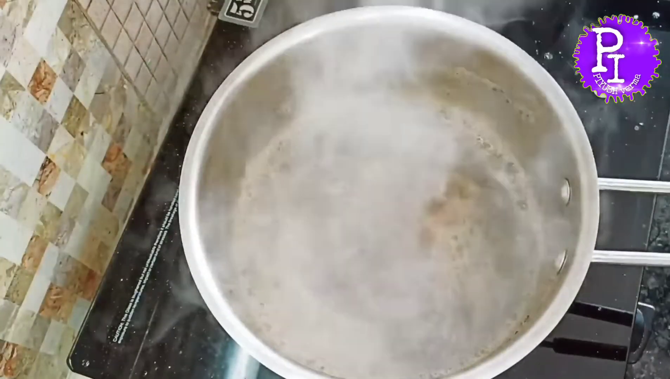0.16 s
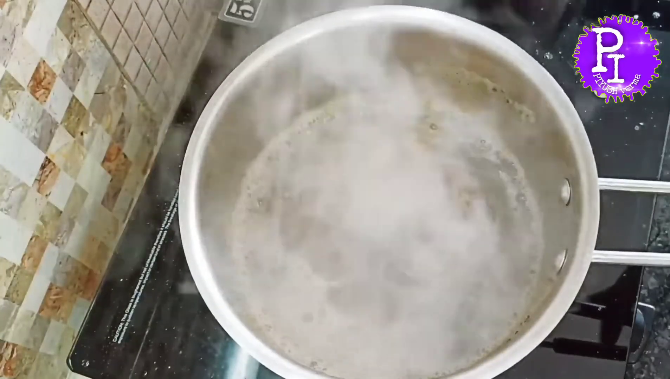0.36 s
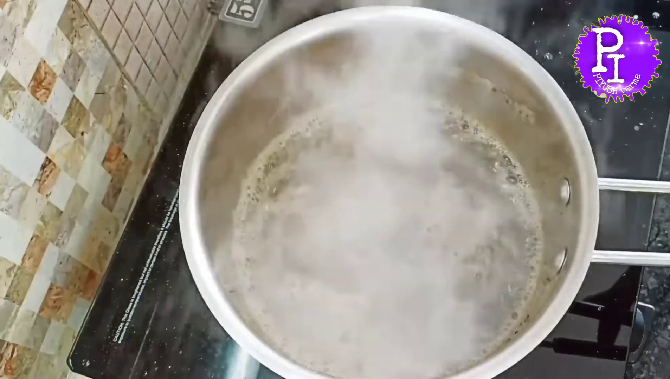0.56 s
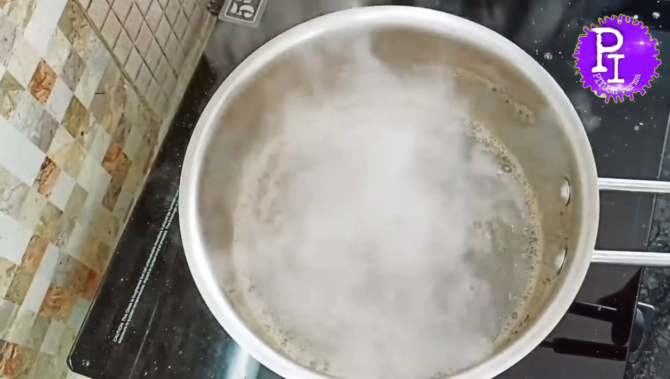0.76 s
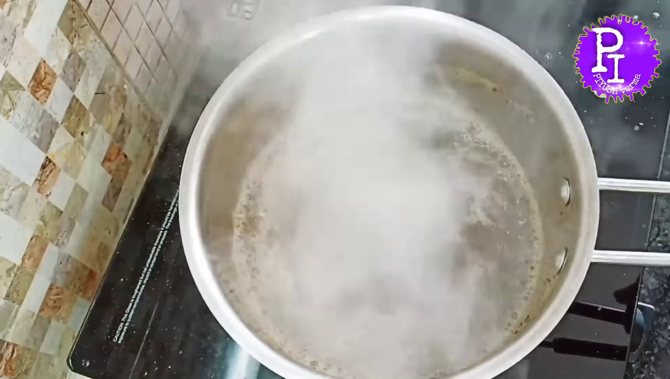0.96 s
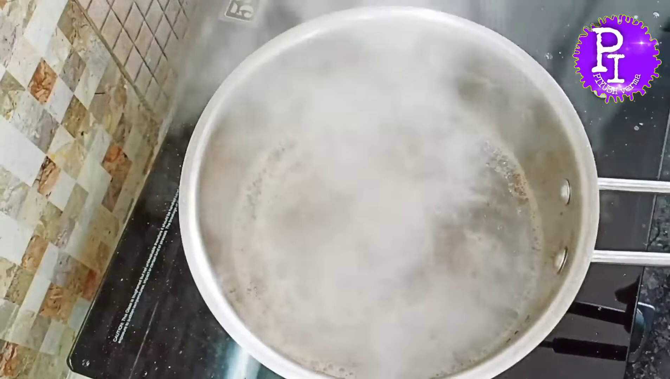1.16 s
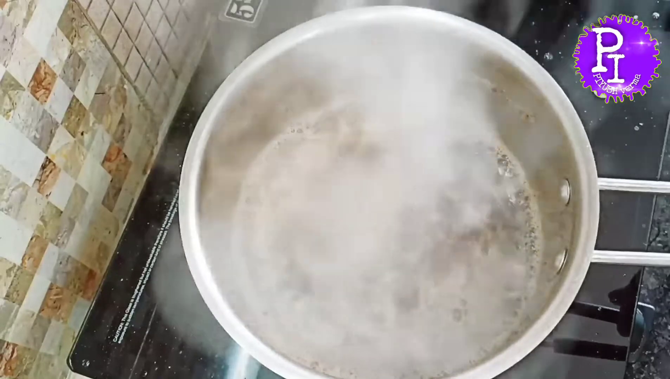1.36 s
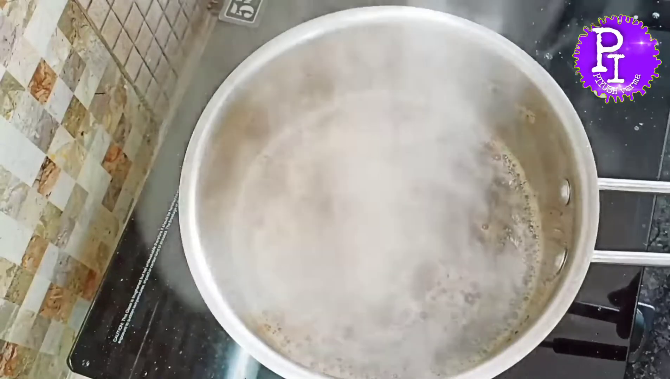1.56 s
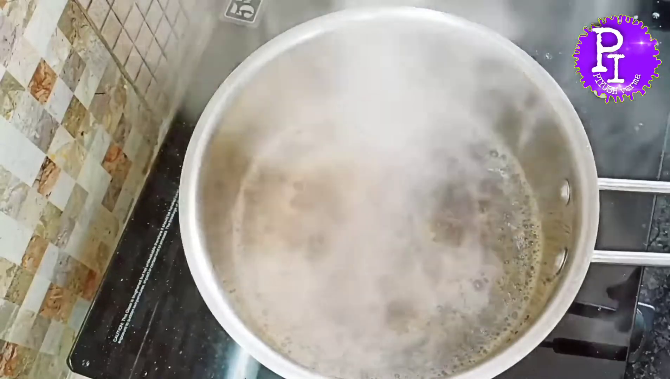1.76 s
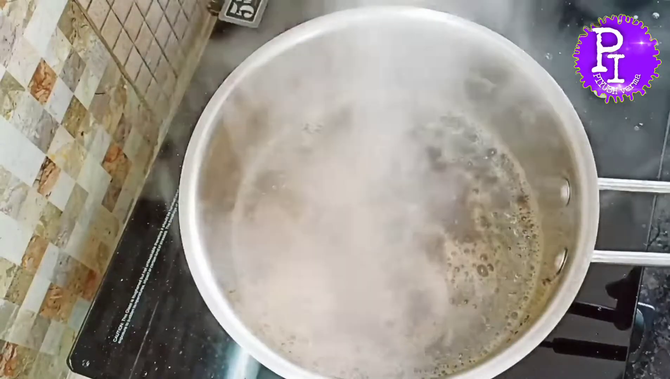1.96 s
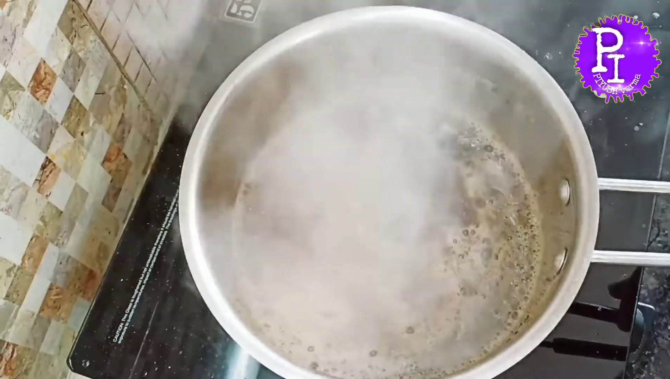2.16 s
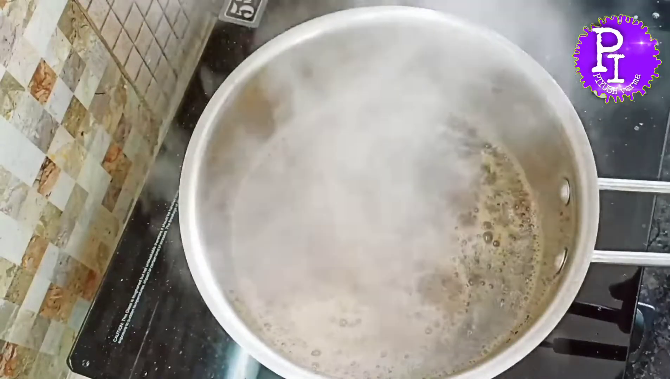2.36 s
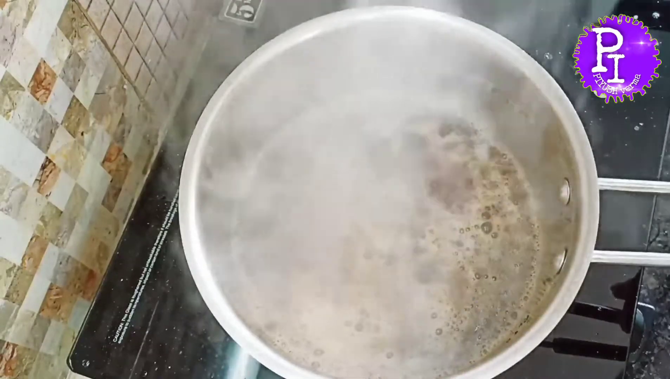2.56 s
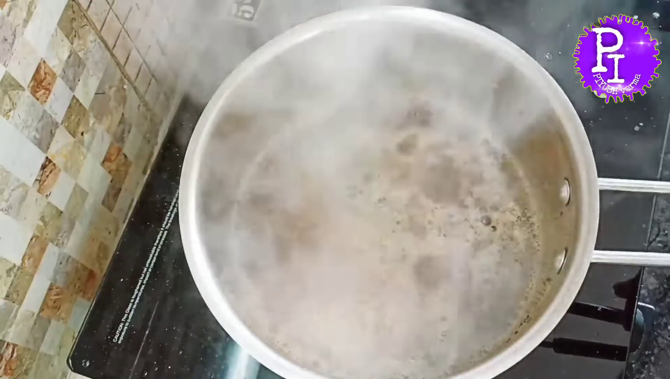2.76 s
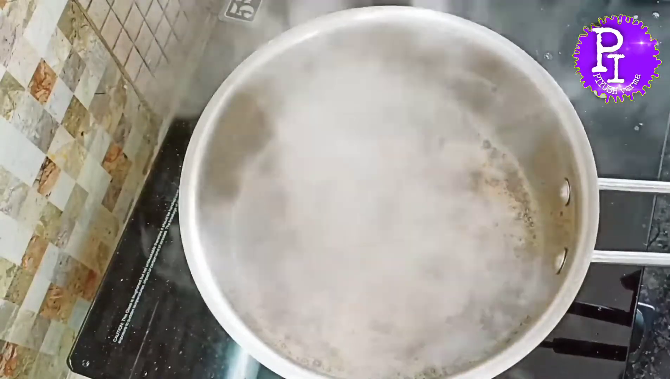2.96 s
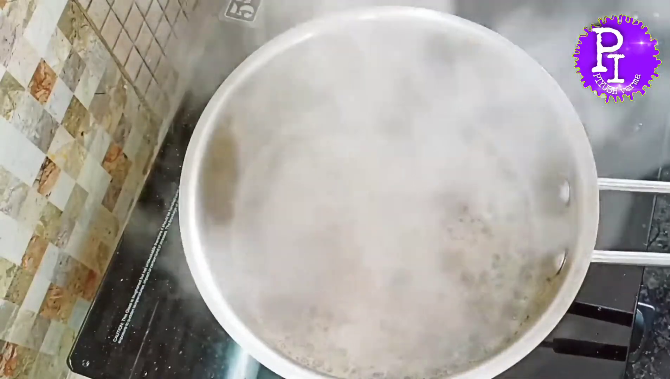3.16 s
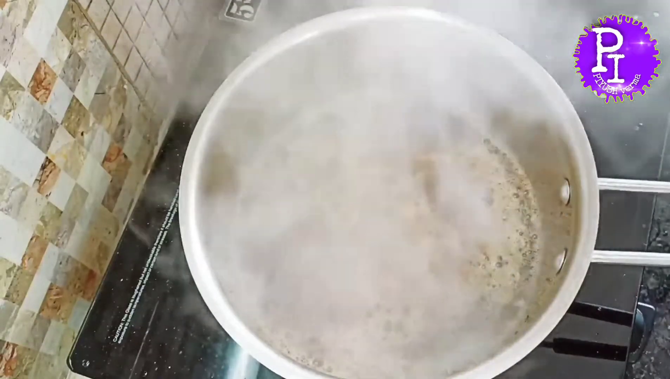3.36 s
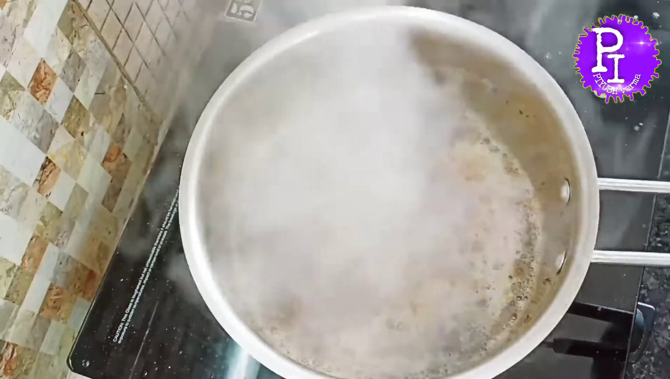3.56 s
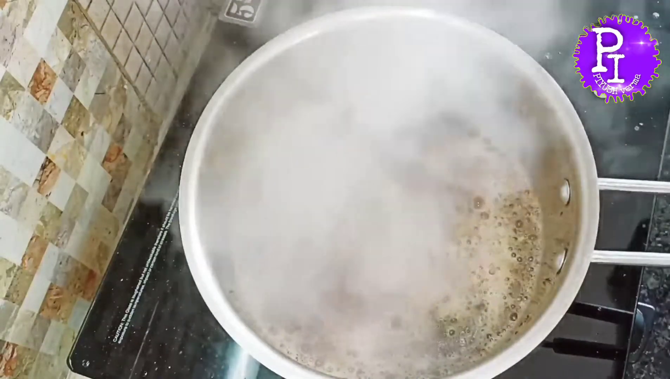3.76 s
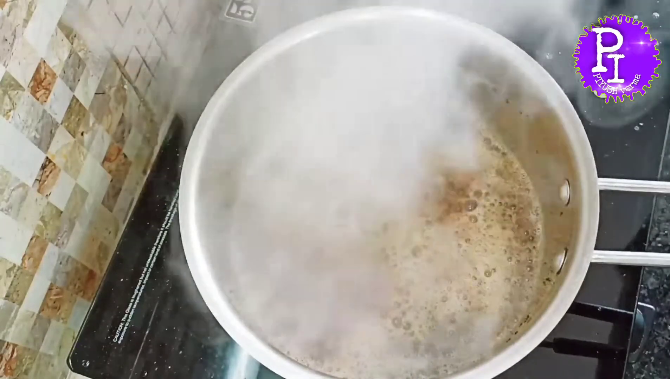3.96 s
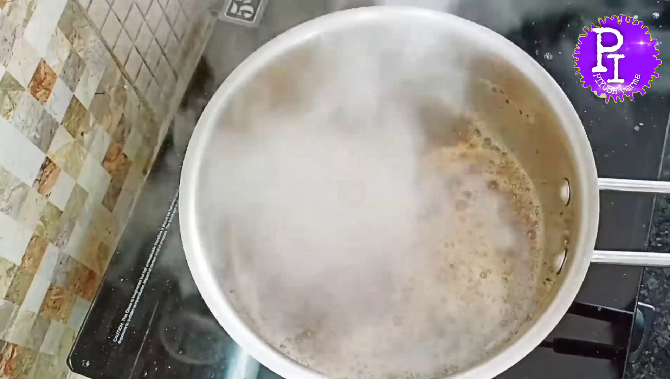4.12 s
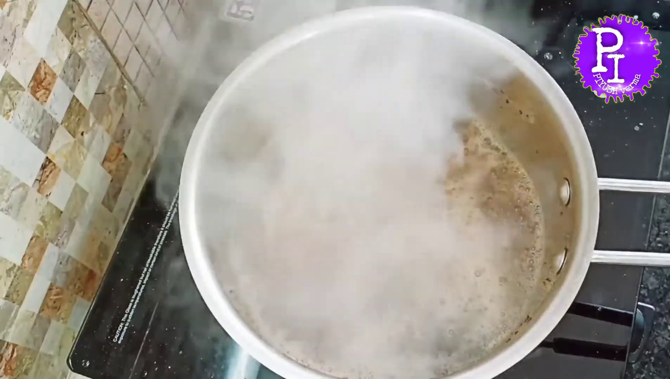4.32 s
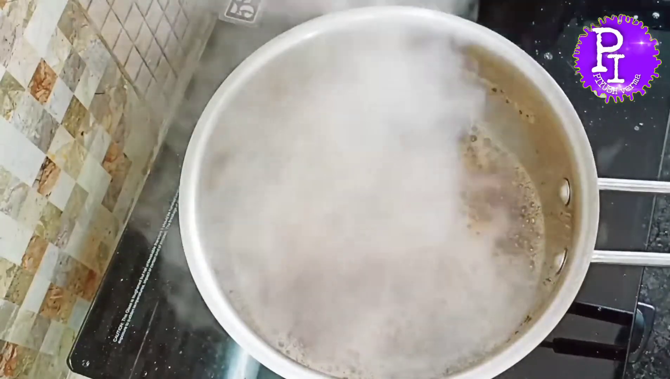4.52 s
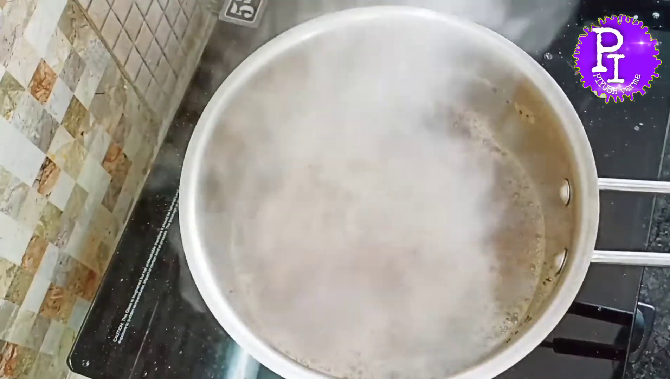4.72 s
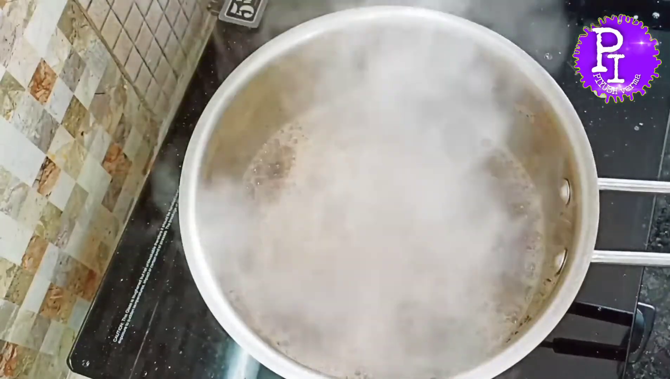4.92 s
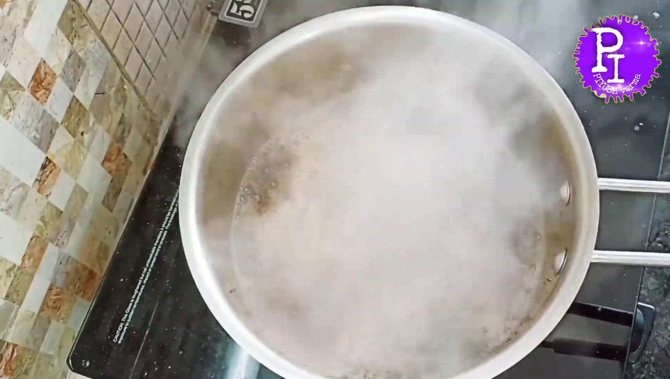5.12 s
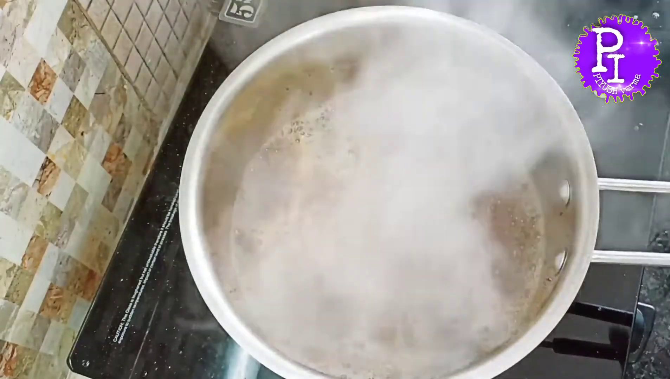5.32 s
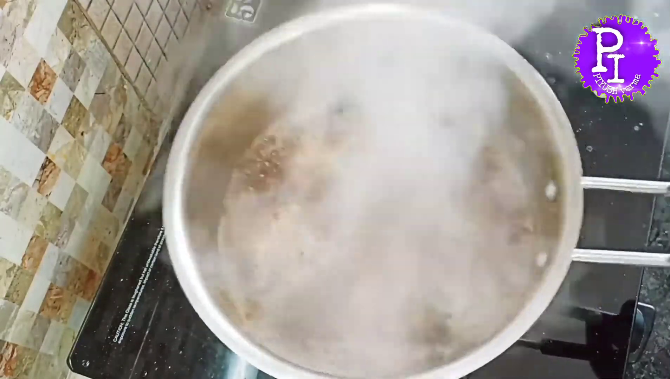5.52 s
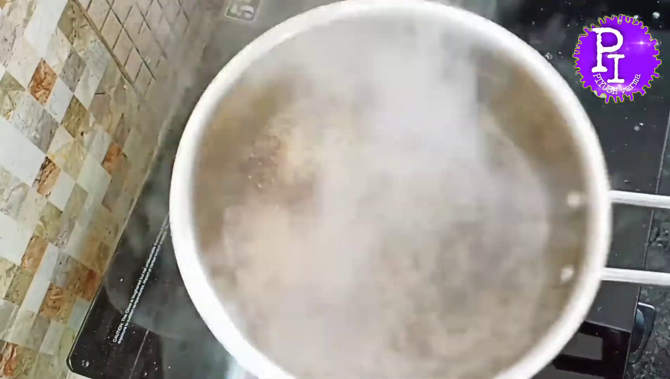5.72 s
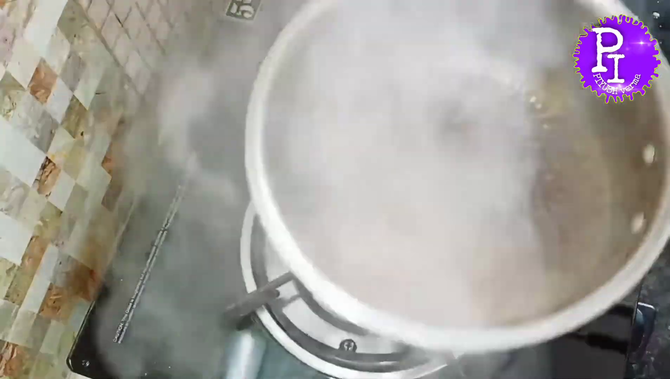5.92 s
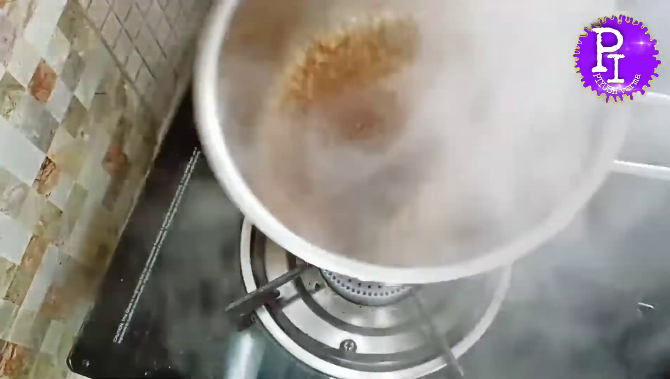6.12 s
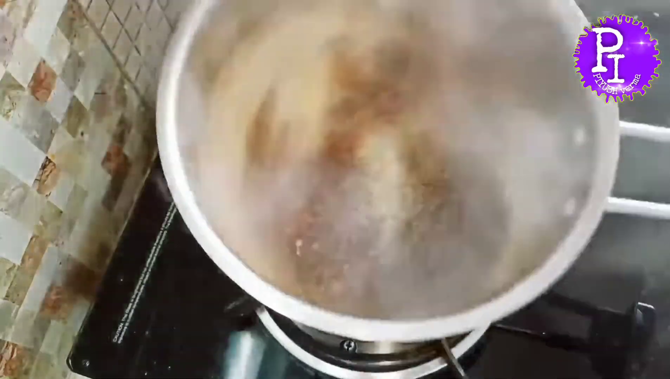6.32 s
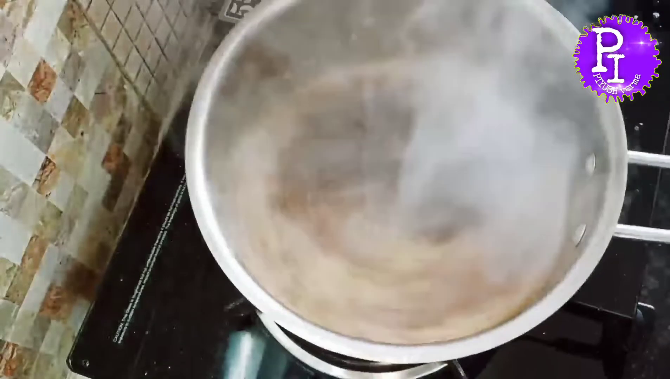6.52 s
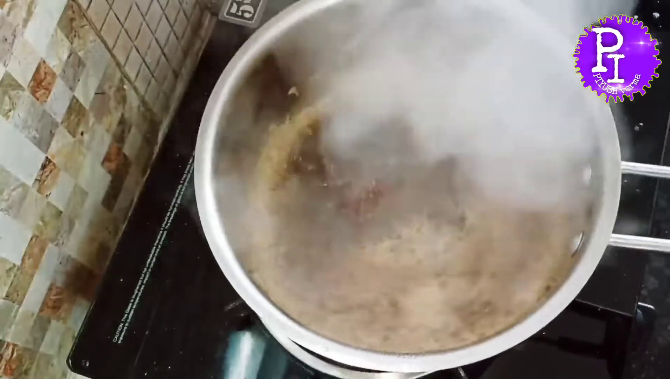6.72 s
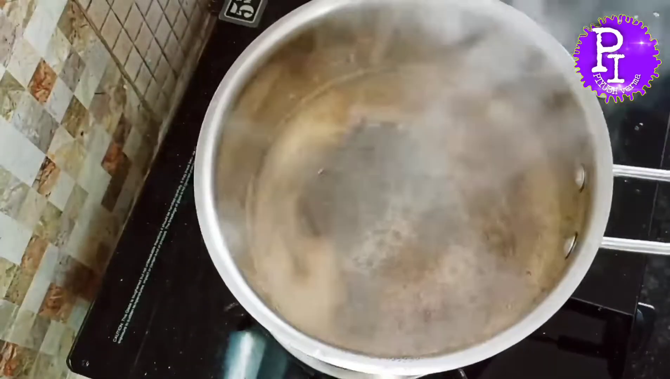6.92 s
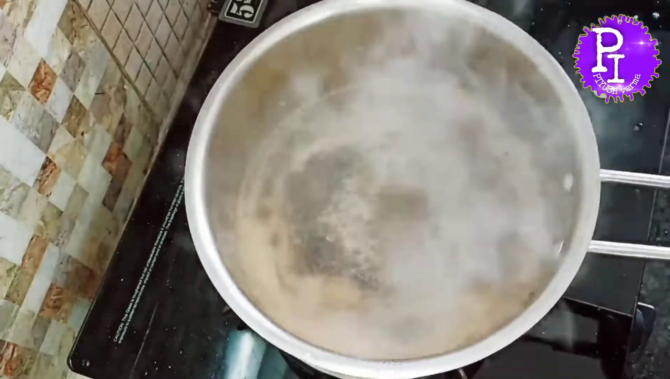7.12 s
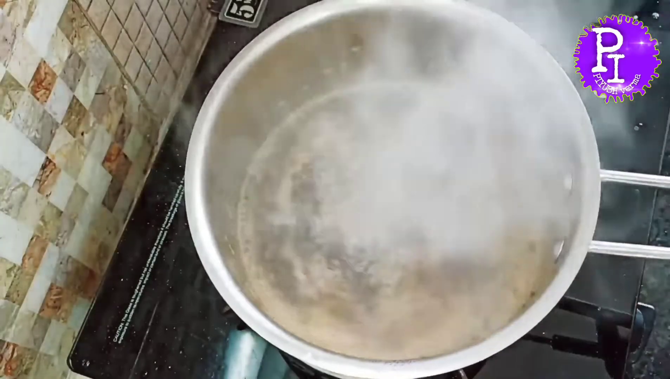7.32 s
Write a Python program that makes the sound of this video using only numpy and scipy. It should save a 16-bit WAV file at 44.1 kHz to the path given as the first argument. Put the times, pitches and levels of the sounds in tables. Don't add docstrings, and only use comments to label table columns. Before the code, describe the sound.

In a small tiled kitchen, a pan of liquid simmers quietly with gas hiss, fine fizz and dull bubbling over a steady low motor hum. Faint bird whistles, surging engine drone and a short horn toot drift in from outside. Near the end the pan clanks hard twice on its trivet, rings and rattles, then a soft steam sizzle swells and fades. One microphone, the same in both channels.

```python
import sys
import numpy as np
from scipy import signal
from scipy.fft import rfft, irfft, next_fast_len
from scipy.io import wavfile
from scipy.ndimage import uniform_filter1d, map_coordinates

SR = 44100
rng = np.random.default_rng(int(sys.argv[2]) if len(sys.argv) > 2 else 0)


def put_to_file(sound):
    columns = np.atleast_2d(sound).T
    safe = np.clip(columns, -1, 1)
    whole_steps = np.round(safe * 32767)
    wavfile.write(sys.argv[1], SR, whole_steps.astype(np.int16))


def decibels_to_gain(level_db):
    exponent = np.asarray(level_db, float) / 20
    return 10 ** exponent


N = 330000
CALM_DB = -47

# (time [s], level [dB])
BOIL_VIGOUR = [(0, -50), (.6, -49), (1.1, -46), (1.7, -47.5), (2.6, -45.8), (4, -44.5), (4.7, -44.5),
               (5.6, -44.5), (6.2, -44), (6.4, -44), (6.7, -42), (7.0, -46), (7.25, -49), (7.48, -48.5)]
# (frequency [Hz], level [dB per Hz])
FIZZ_COLOUR = [(1350, -31), (2300, -8.5), (2780, -3.5), (2920, -3), (3400, -3.5), (3860, -1.5),
               (6430, -4.5), (7480, 1.5), (9650, -11), (10600, -13.5), (12400, -14), (14800, -4),
               (15400, -8)]
# (frequency [Hz], level [dB per Hz])
SPRAY_COLOUR = [(7000, -32), (9500, -23), (12500, -0.5), (14000, -12), (15500, 6)]
# (frequency [Hz], level [dB per Hz])
BUBBLE_COLOUR = [(150, -24), (250, 3), (700, 0.5), (900, -5), (1200, -9), (1500, -4.5), (2100, -13.5),
                 (2700, -15.5), (4000, -43)]
# (frequency [Hz], level [dB per Hz])
RUMBLE_COLOUR = [(20, -12), (50, -13.5), (75, -3.5), (110, 1), (150, -1), (185, -4.5), (260, -33)]
# (time [s], peak [dB], pitch [Hz], duller part [dB])
DROPLETS = [(0.3162, -40, 14700, -8), (0.4903, -38, 14800, -11), (0.63, -41, 9240, -7),
            (0.6614, -43, 15400, -4), (1.0102, -38, 15300, -6), (1.0254, -39, 14700, 0),
            (1.043, -32, 14700, -4), (1.0928, -35, 14400, -15), (1.2264, -39, 15200, -7),
            (1.2807, -39, 15400, -9), (1.9799, -39, 15100, -6), (3.8736, -36, 13600, -7),
            (5.3581, -36, 15300, -6), (5.5857, -40, 14500, -6), (5.9863, -34, 14900, -8),
            (6.0891, -36, 15400, -8), (6.6014, -34, 15000, -5), (6.684, -28.5, 14500, -9)]
# (frequency [Hz], level [dB per Hz])
PAN_MURMUR_COLOUR = [(620, -37), (685, -6), (706, 0), (728, -7), (800, -40)]
# (frequency [Hz], level [dB per Hz])
STEAM_COLOUR = [(880, -36), (1500, -6), (2150, -13), (3150, -6), (3680, -6), (6550, -3.5), (7290, 1.5),
                (11000, -16), (14900, -6), (15400, -10)]

# (time [s], peak [dB], ring [dB], crash [dB], first thud [dB])
BLOWS = [
    (6.1947, -3.5, -10, -19.5, -23),
    (6.3196, -8, -9.5, -20.5, -17),
]
MODE_HZ = [161, 243, 301, 362, 438, 503, 575, 610, 665, 706, 793, 845, 958, 1036, 1350, 1432, 1682, 2256,
           2850, 3128, 3950, 5900, 6950]
MODE_T60 = [.45, .22, .14, .2, .12, .18, .14, .2, .18, .16, .1, .09, .16, .16, .15, .1, .2, .15, .07, .15,
            .06, .07, .04]
FIRST_BLOW_MODES = [-7.5, -5.5, -6.5, -9, 4.5, -7, -21, -2.5, -10, -13, -2, -3.5, -16, -20, -20, -26, -15,
                    -15, -15, -21, -5.5, -14, 0.5]
SECOND_BLOW_MODES = [-28, -7.5, -3, -15, -6, -8, -2, -19, -6.5, -8, -2.5, 1.5, -11, -10.5, -13, -10, -24,
                     -12, -4.5, -25, -7, -26, -23]
# (frequency [Hz], level [dB per Hz])
CRASH_COLOURS = [
    [(60, -35), (100, -14), (300, -1), (500, -4), (850, -5.5), (1250, -11), (3000, -15), (3350, -16.5),
     (4050, -15), (6400, -14.5), (7100, -10), (9400, -18), (11000, -37), (15400, -30)],
    [(90, -40), (200, 3.5), (970, -0.5), (1250, -9.5), (2500, -8), (2900, -11), (3360, -12), (3700, -14),
     (7700, -14), (9500, -20), (10500, -45), (15400, -55)],
]
# (frequency [Hz], t60 [s])
CRASH_DECAY = [(100, 0.33), (400, 0.13), (1000, 0.25), (3000, 0.28), (6000, 0.11), (10000, 0.064)]
# (frequency [Hz], level [dB per Hz])
CHATTER_COLOUR = [(600, -30), (1200, 1), (3000, -1), (5500, -7), (9000, -30)]
# (frequency [Hz], t60 [s])
KITCHEN_DECAY = [(150, 0.39), (1000, 0.64), (3000, 0.52), (10000, 0.66)]

# (multiple of the shaft rate [-], level [dB rms])
STRONG_ORDERS = [(9, -59.2), (10, -60.5), (11, -62.9), (12, -60.5), (13, -59.0), (14, -53.0), (15, -43.6),
                 (16, -50.0), (19, -68.3), (23, -59.0), (24, -62.1), (25, -62.5), (26, -62.3), (27, -62.0),
                 (30, -64.9), (31, -67.5), (32, -63.9), (33, -62.3), (34, -67.6), (35, -67.7), (36, -61.6),
                 (37, -60.5), (39, -64.3), (42, -64.4), (45, -59.8), (46, -63.2), (48, -65.0), (51, -65.3),
                 (52, -64.1), (55, -62.8)]
# (frequency [Hz], level [dB rms])
WEAK_ORDERS = [(55, -82), (80, -65), (200, -68.5), (600, -80), (700, -67.5), (900, -81.5), (1300, -79.5)]

# (time [s], frequency [Hz])
ENGINE_PITCH = [(3.2, 73.5), (3.9, 80.9), (6.5, 84.5), (7.45, 82.1)]
# (time [s], length [s], level [dB rms])
THROTTLE = [
    (3.28, .44, -48),
    (3.94, 0.67, -53),
    (4.64, 0.35, -46),
    (5.1, 0.72, -42),
    (5.84, 0.47, -44),
    (6.245, .86, -46),
    (7.137, 0.21, -50),
]
# (frequency [Hz], level [dB rms], loudest beat [s], far echo share [-], side echo share [-])
HORN_TONES = [
    (3153, -39, 5.035, .5, .42),
    (2759, -52.5, 5.02, .2, .75),
    (3534, -48, 5.003, .8, .1),
]
# (time [s], length [s], start pitch [Hz], end pitch [Hz], level [dB rms])
BIRD_NOTES = [(2.96, .07, 2980, 2990, -56), (3.2, .09, 3010, 2960, -60), (3.32, .04, 2800, 2900, -59),
              (3.42, .05, 3010, 2940, -55), (3.478, .04, 2880, 3050, -57), (3.672, 0.13, 3060, 2940, -54.5),
              (3.93, 0.11, 2960, 2960, -56), (4.03, .03, 2820, 2810, -56), (4.189, .08, 2960, 2910, -53),
              (4.332, .04, 2970, 3070, -58), (5.17, .12, 3030, 3000, -57)]


def unit(x):
    return x / np.sqrt(np.mean(x ** 2) + 1e-20)


def along(points, hz):
    f, value = np.transpose(points)
    return np.interp(np.log(hz + 1), np.log(f + 1), value)


def curve(rows):
    s, value = np.transpose(rows)
    return np.interp(np.arange(N) / SR, s, value)


def wobble(rate, size=N):
    knots = rng.standard_normal(int(size * rate / SR) + 4)
    return map_coordinates(knots, [np.arange(size) * rate / SR])


def swell(start, length, edge):
    t = np.arange(N) / SR - start
    return np.sin(np.pi / 2 * np.clip(np.minimum(t, length - t) / edge, 0, 1)) ** 2


def coloured(x, spectrum):
    m = next_fast_len(len(x) + 8192)
    gain = decibels_to_gain(along(spectrum, np.fft.rfftfreq(m, 1 / SR)))
    return unit(irfft(rfft(x, m) * gain, m)[:len(x)])


def patchy(patchy_db):
    z = signal.stft(rng.standard_normal(N), nperseg=512)[2]
    field = uniform_filter1d(rng.standard_normal(z.shape), size=6, axis=0)
    field = uniform_filter1d(field, size=10, axis=1)
    return signal.istft(z * decibels_to_gain(patchy_db * unit(field)), nperseg=512)[1][:N]


def grains(count, hz, cycles, scatter_db, rise, size):
    when, pitch, loud = rng.random((count, 3)).T
    f = hz * np.exp(1.6 * (pitch - .5))[:, None]
    turns = f * np.arange(size) / SR
    ring = np.sin(2 * np.pi * turns * (1 + rise * turns / cycles))
    ring *= np.exp(-2 * turns / cycles) * (1 - np.exp(-2 * turns))
    ring *= decibels_to_gain(-scatter_db * np.log(1 - .99 * loud))[:, None]
    at = (when * N).astype(int)[:, None] + np.arange(size)
    return unit(np.bincount(at.ravel(), ring.ravel(), N + size)[:N])


def tone(hz):
    return np.sqrt(2) * np.sin(2 * np.pi * (np.cumsum(hz) / SR + rng.random()))


def dying(decays, seconds):
    size = int(seconds * SR)
    hz, t, z = signal.stft(rng.standard_normal(size), SR, nperseg=256)
    fade = decibels_to_gain(-60 * t / along(decays, hz)[:, None])
    return signal.istft(z * fade, SR, nperseg=256)[1][:size]


def simmer():
    fizz_db = curve(BOIL_VIGOUR)
    bubbling_db = -49 + 0.83 * (fizz_db - CALM_DB)
    spray_db = -49.5 + 0.3 * (fizz_db - CALM_DB)
    rumble_db = -47.5 + 0.56 * np.arange(N) / SR
    heave = wobble(10)
    flurries = unit(decibels_to_gain(2.5 * wobble(14)))

    specks = grains(count=9000, hz=11460, cycles=2.6, scatter_db=3.5, rise=0.033, size=40)
    fizz = coloured(patchy(patchy_db=0.37) + 0.3 * flurries * specks, FIZZ_COLOUR)
    bubbles = grains(count=900, hz=1108, cycles=11.8, scatter_db=2.5, rise=0.15, size=700)
    bubbling = coloured(patchy(patchy_db=0.93) + 0.094 * bubbles, BUBBLE_COLOUR)
    rumble = coloured(patchy(patchy_db=1.0), RUMBLE_COLOUR)
    bursts = grains(count=5000, hz=14000, cycles=2.2, scatter_db=2.5, rise=.05, size=30)
    spray = coloured(patchy(patchy_db=0.0) + 0.98 * flurries * bursts, SPRAY_COLOUR)

    out = decibels_to_gain(fizz_db + 0.22 + .5 * heave + 0.27 * wobble(25)) * fizz
    out += decibels_to_gain(bubbling_db + 1.14 * heave) * bubbling
    out += decibels_to_gain(rumble_db) * rumble
    out += decibels_to_gain(spray_db + 1.4 * heave + 1.4 * wobble(24.9)) * spray

    t = np.arange(60) / SR
    for s, db, hz, dull_db in DROPLETS:
        pop = np.sin(2 * np.pi * hz * t) + decibels_to_gain(dull_db - 2) * np.sin(2 * np.pi * 7600 * t)
        out[round(s * SR):][:60] += decibels_to_gain(db + 8 - 60 * t / .0012) * pop
    return out


def murmur():
    level_db = -60.5 + 1.5 * (curve(BOIL_VIGOUR) - CALM_DB) + 2.4 * wobble(2.99)
    return decibels_to_gain(level_db) * coloured(rng.standard_normal(N), PAN_MURMUR_COLOUR)


def sizzle():
    steam = coloured(patchy(patchy_db=1.5), STEAM_COLOUR)
    return swell(start=6.42, length=.66, edge=0.31) * decibels_to_gain(-41.5 + .5 * wobble(23)) * steam


def mode_ring(levels_db, t):
    ring = np.zeros(len(t))
    for hz, db, t60 in zip(MODE_HZ, levels_db, MODE_T60):
        slosh = 0.044 * np.log(hz / 40) * wobble(78, size=len(t))
        ring += decibels_to_gain(db - 60 * t / t60) * np.sin(2 * np.pi * (hz * t + rng.random() + slosh))
    return ring


def trivet_chatter(t):
    bounces = unit(decibels_to_gain(5 * wobble(160, size=len(t))))
    return decibels_to_gain(-60 * t / 0.51) * bounces * coloured(rng.standard_normal(len(t)), CHATTER_COLOUR)


def clanks():
    dry = np.zeros(N)
    t = np.arange(SR // 2) / SR
    struck = (FIRST_BLOW_MODES, SECOND_BLOW_MODES)
    for (s, db, ring_db, crash_db, thud_db), modes, colour in zip(BLOWS, struck, CRASH_COLOURS):
        blow = decibels_to_gain(ring_db) * mode_ring(modes, t)
        blow += decibels_to_gain(crash_db - 5.5) * coloured(dying(CRASH_DECAY, .5), colour)
        thud = coloured(rng.standard_normal(len(t)), colour)
        blow += decibels_to_gain(thud_db + 3 - 60 * t / 0.04) * thud
        blow += decibels_to_gain(-35.5 - db) * trivet_chatter(t)
        attack = 1 - np.exp(-t / 0.00036)
        dry[round(s * SR):][:len(t)] += decibels_to_gain(db) * attack * blow
    dry = signal.sosfilt(signal.butter(3, 95, 'high', fs=SR, output='sos'), dry)
    tail = dying(KITCHEN_DECAY, .7)
    delayed = np.pad(dry, (300, 0))
    return dry + decibels_to_gain(-9.0) * signal.fftconvolve(delayed, tail / np.linalg.norm(tail))[:N]


def motor():
    shaft_hz = 11.093
    order = np.arange(5, 110)
    level_db = along(WEAK_ORDERS, order * shaft_hz) + 4 * rng.standard_normal(len(order))
    for multiple, db in STRONG_ORDERS:
        level_db[order == round(multiple)] = db
    phase = rng.random((len(order), 1))
    phase[9] = 2 * phase[10] - phase[11] + .5
    turn = np.arange(4097) / 4096
    cycle = np.sqrt(2) * decibels_to_gain(level_db) @ np.sin(2 * np.pi * (order[:, None] * turn + phase))
    angle = np.cumsum(shaft_hz * (1 + 0.00026 * wobble(1.57))) / SR
    return decibels_to_gain(0.17 * wobble(2.67)) * np.interp(angle % 1, turn, cycle)


def engine():
    t = np.arange(N) / SR
    throttle = np.zeros(N)
    for s, length, db in THROTTLE:
        sag_db = 4 * (t - s - length / 2)
        throttle += decibels_to_gain(db - sag_db) * swell(s, length, edge=.07)
    hz = curve(ENGINE_PITCH) * (1 + 0.0146 * wobble(12))
    return throttle * decibels_to_gain(1.6 * wobble(16)) * tone(hz)


def groan():
    t = np.arange(N) / SR
    hz = 153.3 + 5.5 * np.cos(2 * np.pi * 4.3 * (t - 0.99))
    level = swell(start=0.673, length=.46, edge=.07) * decibels_to_gain(-42 + 2.7 * wobble(17.2))
    return level * tone(hz * (1 + 0.0105 * wobble(11.85)))


def horn():
    far_echo_shift = .0036
    t = np.arange(N) / SR
    late = t - 5.055
    dying_db = -60 * late / .75 - 6 * np.minimum(late / .02, 1)
    loudness_db = np.where(late < 0, 25 * late, dying_db)
    out = np.zeros(N)
    for hz, db, crest, far, side in HORN_TONES:
        slip = np.exp(1j * np.pi * far_echo_shift * hz * (t - crest))
        beat = np.abs(1 + far * slip ** 2 + 1j * side * slip)
        level = swell(start=4.74, length=1, edge=.1) * decibels_to_gain(db + loudness_db - .5 + 2 * wobble(70))
        out += level * beat * tone(hz * (1 + .002 * wobble(60)))
    return out


def bird():
    out = np.zeros(N)
    for s, length, start_hz, end_hz, db in BIRD_NOTES:
        u = np.linspace(0, 1, int(length * SR))
        flutter = 1 + 0.51 * np.sin(2 * np.pi * 45 * u * length)
        whistle = tone(start_hz + (end_hz - start_hz) * u)
        out[round(s * SR):][:len(u)] += decibels_to_gain(db - 0.5) * np.sin(np.pi * u) ** 0.52 * flutter * whistle
    return out


def scene():
    stove = simmer() + murmur() + sizzle() + clanks()
    street = engine() + groan() + horn() + bird()
    mono = stove + motor() + street
    return np.array([mono, mono])


def band_limit(x):
    return signal.sosfilt(signal.butter(12, 16710, fs=SR, output="sos"), x)


def record(dry):
    held = dry / (1 + np.abs(dry / .95) ** 4) ** (1 / 4)
    hz = np.fft.rfftfreq(N, 1 / SR)
    bass_loss = (1j * hz / (45 + 1j * hz)) ** 2
    band = (hz < 15490) * bass_loss
    return band_limit(irfft(rfft(held) * band, N))


dry = scene()
out = record(dry)
put_to_file(out)
```